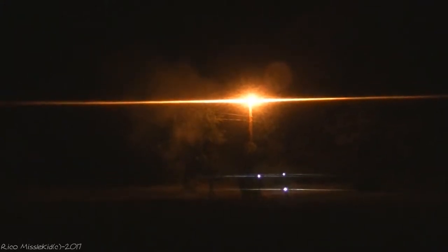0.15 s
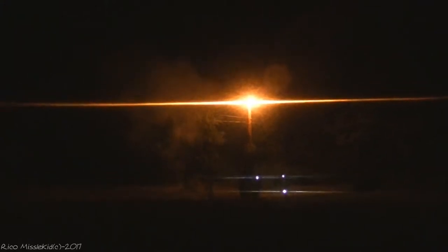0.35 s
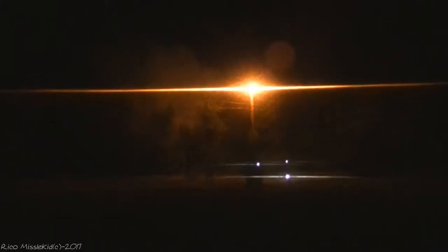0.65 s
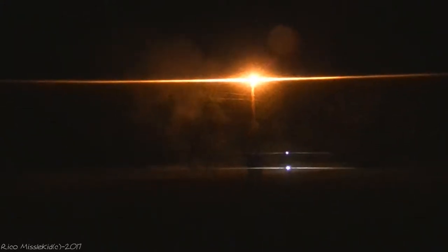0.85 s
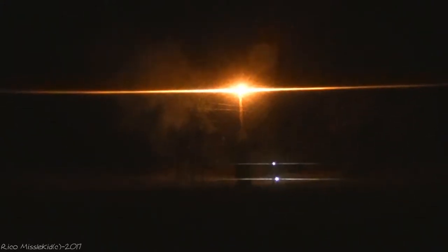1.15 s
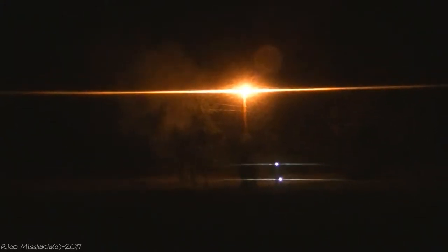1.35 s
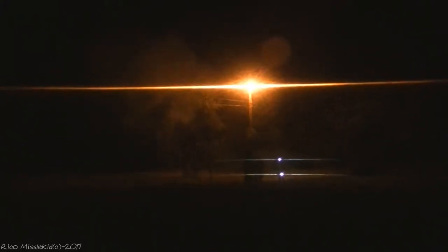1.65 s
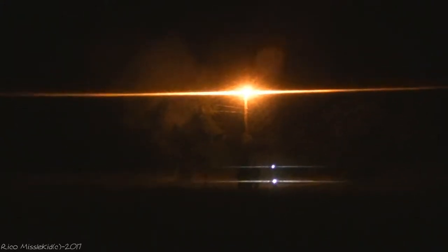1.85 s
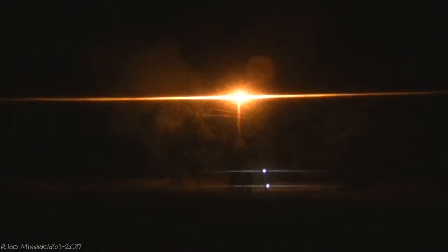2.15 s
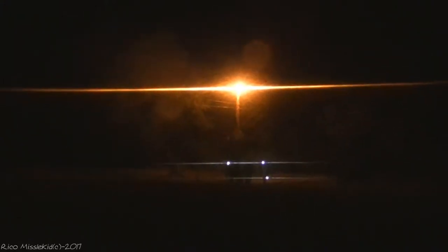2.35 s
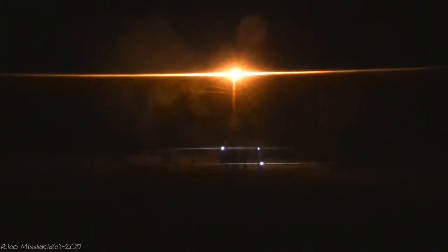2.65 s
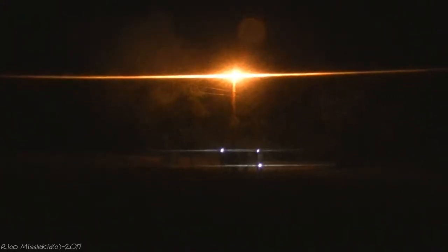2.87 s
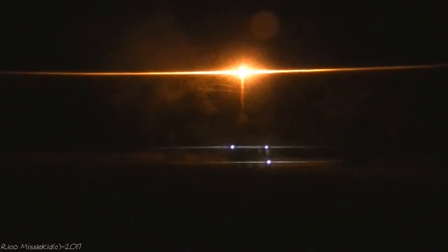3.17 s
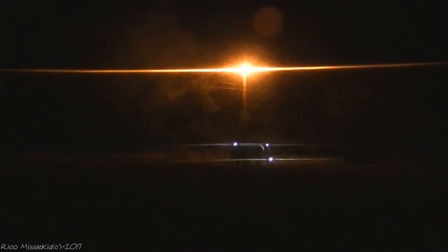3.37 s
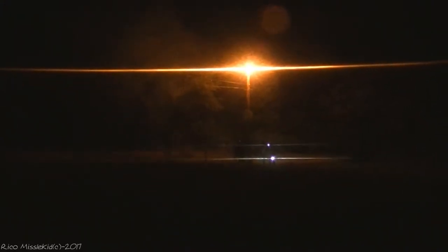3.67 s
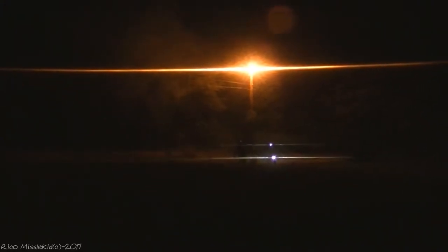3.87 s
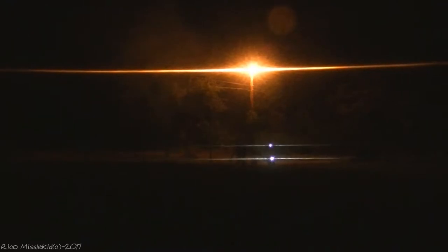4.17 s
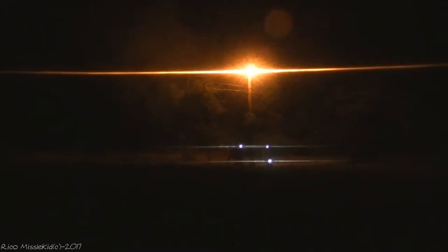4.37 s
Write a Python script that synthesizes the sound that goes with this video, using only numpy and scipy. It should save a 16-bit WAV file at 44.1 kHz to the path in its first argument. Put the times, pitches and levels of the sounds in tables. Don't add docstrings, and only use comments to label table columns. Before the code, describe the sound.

A dense, unbroken chorus of crickets and raspy katydids fills a dark grass field, with a sharp stem tick just after two seconds.

```python
import sys
import numpy as np
from scipy import signal
from scipy.fft import rfft, irfft, next_fast_len
from scipy.io import wavfile
from scipy.ndimage import uniform_filter1d, map_coordinates

SR = 44100
rng = np.random.default_rng(int(sys.argv[2]) if len(sys.argv) > 2 else 0)


def gain_from_db(level_db):
    decades = np.asarray(level_db, float) / 20
    return 10 ** decades


def output_pcm(signal):
    pcm = np.clip(np.atleast_2d(signal).T, -1, 1) * 32767
    wavfile.write(sys.argv[1], SR, np.round(pcm).astype(np.int16))


N = 199053

# pitch in Hz, pitch spread in Hz, wing strokes per second, stroke sharpness (exponent),
# level in dB, stereo width in radians, left lean in dB.
CRICKET_KINDS = [
    (3031, 70, 75, 5.1, -43, 0.47, 2.5),
    (3873, 74, 46, 1.45, -42.5, 0.25, 2.7),
    (6984, 150, 92, 1.7, -50, 0.22, -0.5),
]
# time in seconds, then low, middle and high kind in dB.
CRICKET_SWELL = [(0.0, -3.5, -0.9, 1.15), (4.51, -1.8, 0.5, -0.8)]

# time in seconds, level in dB.
CROWD_EFFORT = [(0.0, -39.5), (0.7, -41), (1.21, -40.5), (1.41, -41), (1.59, -40.5), (1.8, -38.5),
                (2.15, -42), (2.59, -40), (2.74, -41), (4.51, -41)]
# frequency in Hz, density in dB per Hz.
LOW_RASP = [(1400, -120), (1600, -45), (1800, -11), (2080, -1), (2450, -3), (2900, 3), (3500, 3.5),
            (4000, -3.5), (4600, -120)]
HIGH_RASP = [(3000, -120), (3500, -22.5), (4150, -1), (4700, 0.5), (5250, -1.5), (5800, -5.5),
             (6250, -13.5), (6800, -14.5), (7500, -53), (8200, -120)]
LOW_RASP_DB, HIGH_RASP_DB = -43, -40
LOW_FOLLOWS = 0.1

# time in seconds, strength at the ports in dB.
BREEZE = [(0, -75), (.1, -88), (.64, -84), (.73, -77.5), (1.52, -76.5), (2.05, -87.5), (2.21, -85),
          (2.34, -92), (2.47, -78.5), (2.71, -80), (2.78, -78), (3.27, -81), (3.66, -88), (4.1, -83),
          (4.51, -78)]
# time in seconds, level in dB.
TRAFFIC_LEVEL = [(0, -69.5), (.45, -71.5), (.9, -85), (1.7, -77), (2.6, -98), (4.1, -89), (4.51, -76)]
# frequency in Hz, density in dB per Hz.
BUFFET_COLOUR = [(12, -25), (20, 1), (129, -2.5), (180, -3), (230, -44), (400, -120)]
ROAD_COLOUR = [(120, -60), (200, -7), (280, -0.5), (400, -6), (550, -21), (800, -60)]
HUM_COLOUR = [(100, -29), (170, -12.5), (252, -1.5), (750, -7), (900, -6), (1210, -9), (1700, -2),
              (2210, -28), (3740, -120)]
HISS_COLOUR = [(5000, -52), (7000, -4.5), (7600, 1), (8200, -8), (9000, -5.5), (10200, -7.5), (11100, -7),
               (13100, -12), (15600, -17.5)]
# frequency in Hz, left-right likeness from -1 to 1.
HUM_ALIKE = [(60, .06), (130, 0.12), (290, -0.43), (640, -0.1), (1400, 0.43)]
# frequency in Hz, level in dB.
WHINE_LINES = [(7853, -86), (7882, -85)]
HUM_DB, HISS_DB = -65, -63.5
HUM_FOLLOWS, HISS_FOLLOWS = .2, 0.13

# first stroke in seconds,
# last stroke in seconds, wing resonance in Hz, first level in dB, last level in dB.
NEAREST = [(.125, .125, 5120, -44, -43), (.506, 0.74, 5240, -42.5, -49), (.84, 1.06, 5060, -44.5, -47),
           (1.2, 1.25, 5220, -49, -48), (1.645, 1.865, 5180, -47, -45), (2.059, 2.059, 5170, -46, -44),
           (2.386, 2.64, 5110, -43, -44.5), (3.145, 3.377, 5200, -44, -41),
           (3.807, 3.807, 5110, -42, -44.5), (3.971, 4.19, 5290, -41, -44),
           (4.479, 4.479, 5070, -43.5, -44)]
NEAR = [(.03, 0.14, 4600, -51, -48), (.37, .635, 4850, -44.5, -45), (.39, .52, 4550, -50, -45),
        (.635, .635, 4600, -43, -43), (.5, .635, 5600, -50, -45.5), (.859, .958, 4600, -41, -40),
        (.846, .949, 5650, -48, -48), (1.167, 1.277, 4600, -44, -41), (1.4, 1.4, 4770, -45, -46),
        (1.25, 1.25, 5700, -45.5, -46), (1.634, 1.875, 4900, -41, -42), (1.64, 1.88, 4500, -51, -46),
        (2.344, 2.618, 4800, -47, -47), (3.155, 3.48, 5550, -49, -48.5), (3.17, 3.29, 4570, -54, -47),
        (3.58, 3.66, 5030, -47, -48), (3.85, 3.96, 4750, -47, -44), (4.41, 4.41, 4900, -45, -45)]
DEEP = [(1.876, 1.978, 2340, -51, -56), (2.381, 2.595, 2750, -49, -46), (3.361, 3.47, 2640, -48, -49),
        (3.952, 4.09, 2600, -48.5, -50)]
TINY = [(3.7, 3.815, 12300, -71, -70), (4.43, 4.43, 12000, -71, -71), (2.76, 2.76, 11800, -72, -72)]
# middle in seconds, pitch in Hz, level in dB.
THIN_TRILLS = [(2.6, 10900, -76), (2.85, 10850, -75), (3.1, 10850, -75), (4.2, 10900, -75)]
SYLLABLE_S = .115

# middle in seconds, length in seconds, level change in dB.
LULLS = [(.68, 0.026, -0.5), (0.93, 0.035, -1.5), (3.202, 0.017, -2.5), (3.53, 0.057, -1.5),
         (4.24, 0.056, -1)]
JOIN_DB, JOIN_S = 0.5, 0.038
CROWD_JOINS = 1.23

# start in seconds, end in seconds, first pitch in Hz, last pitch in Hz, level in dB.
PEEPS = [(0.0495, .14, 920, 905, -68), (1.46, 1.582, 1020, 925, -69), (1.632, 1.72, 880, 1000, -71),
         (2.473, 2.518, 910, 880, -68), (4.22, 4.364, 945, 850, -70.5), (3.39, 3.52, 2375, 2360, -45.5),
         (3.03, 3.24, 335, 350, -72.5)]

# start in seconds, peak level in dB, ring in Hz, share of crack.
STEM_TICKS = [(1.048, -52, 10800, .1), (1.082, -39.5, 9840, .4), (1.0825, -42, 8260, .1),
              (1.0905, -52, 9800, .05), (1.1915, -47, 8600, .1), (1.2012, -46, 8350, .05),
              (2.1335, -55, 10200, .5), (2.165, -25, 6900, .07), (2.165, -39.5, 8900, .4)]
# start in seconds, end in seconds, centre in Hz, level in dB.
STEM_DRAGS = [(2.13, 2.17, 9900, -59), (2.168, 2.21, 8000, -53), (1.05, 1.11, 8800, -62)]
STEM_LAG = .45


def unit(x):
    return x / np.sqrt(np.mean(x ** 2) + 1e-20)


def lean(db):
    return gain_from_db([[db / 2], [-db / 2]])


def bell(x, centre, width):
    return np.exp(-.5 * ((x - centre) / width) ** 2)


def along(points, hz):
    f, v = np.transpose(points)
    return np.interp(np.log(hz + 1), np.log(f + 1), v)


def curves(rows):
    s, *columns = np.transpose(rows)
    return [np.interp(np.arange(N) / SR, s, column) for column in columns]


def wobble(rate):
    return map_coordinates(rng.standard_normal(400), [np.arange(N) * min(rate, 80) / SR])


def filtered(x, response):
    m = next_fast_len(x.shape[-1] + 8192)
    return irfft(rfft(x, m) * response(np.fft.rfftfreq(m, 1 / SR)), m)[..., :x.shape[-1]]


def rush(spectrum, alike, patchy_db, lean_db=0):
    z = signal.stft(rng.standard_normal((2, N)), nperseg=512)[2]
    patches = uniform_filter1d(rng.standard_normal(z.shape[1:]), size=9, axis=0)
    for frames in (8, 5):
        patches = uniform_filter1d(patches, size=frames, axis=1)
    pair = signal.istft(z * gain_from_db(patchy_db * unit(patches)), nperseg=512)[1][:, :N]

    def mid_side(hz):
        turn = np.arccos(np.clip(along(alike, hz), -1, 1)) / 2
        return gain_from_db(along(spectrum, hz)) * [np.cos(turn), np.sin(turn)]

    mid, side = filtered(pair, mid_side)
    return unit(np.array([mid + side, mid - side]) * lean(lean_db))


def add(out, s, sound):
    i = max(round(s * SR), 0)
    out[..., i:i + sound.shape[-1]] += sound[..., :max(N - i, 0)]


def crickets(count=18):
    out = np.zeros((2, N))
    for row, swell_db in zip(CRICKET_KINDS, curves(CRICKET_SWELL)):
        hz, spread_hz, rate, sharp, db, width, lean_db = row
        kind = np.zeros((2, N))
        for place in np.sinh(1.6 * np.linspace(-1, 1, count)):
            pitch = hz + spread_hz * (.8 * place + .35 * wobble(40))
            stroke_rate = rate * (1 + .12 * rng.standard_normal() + 0.04795 * wobble(6))
            stroke = np.pi * np.cumsum(stroke_rate) / SR
            size = np.abs(np.sin(stroke + 7 * rng.random())) ** sharp * gain_from_db(1.5 * wobble(3.85))
            phase = 2 * np.pi * (np.cumsum(pitch) / SR + rng.random())
            lag = width * rng.choice([-1, 1]) * (0.5 + 0.76 * rng.random())
            kind += size * np.sin([phase + lag, phase - lag])
        out += gain_from_db(db + swell_db) * unit(kind) * lean(lean_db)
    return out


def katydid_crowd():
    effort_db, = curves(CROWD_EFFORT)
    effort_db = effort_db - effort_db.mean()
    low = rush(LOW_RASP, [(1600, 0.47), (2200, 0.83), (3500, 0.88)], patchy_db=0.8, lean_db=1.5)
    high = rush(HIGH_RASP, [(4000, 0.97), (5000, 0.94), (7000, .94)], patchy_db=1.2, lean_db=0.7)
    return gain_from_db(LOW_RASP_DB + LOW_FOLLOWS * effort_db) * low + gain_from_db(HIGH_RASP_DB + effort_db) * high


def air():
    breeze_db, = curves(BREEZE)
    gust_db = breeze_db - breeze_db.mean()
    buffet = rush(BUFFET_COLOUR, [(30, 0.24), (150, .05)], patchy_db=-0.2, lean_db=0.5)
    buffet *= gain_from_db(breeze_db + 1.5 + 0.64 * wobble(4.9))
    road = gain_from_db(curves(TRAFFIC_LEVEL)[0]) * rush(ROAD_COLOUR, [(300, .3)], patchy_db=-0.5)
    hum = gain_from_db(HUM_DB + HUM_FOLLOWS * gust_db) * rush(HUM_COLOUR, HUM_ALIKE, patchy_db=0.5)
    hiss_alike = [(8000, 0.94), (9300, 0.92), (10500, 0.92), (12500, 0.93), (15000, 0.79)]
    hiss = rush(HISS_COLOUR, hiss_alike, patchy_db=0.5)
    hiss *= gain_from_db(HISS_DB + HISS_FOLLOWS * gust_db + 0.69 * wobble(21.02))
    t = np.arange(N) / SR
    whine = sum(gain_from_db(db + 3 + 3 * wobble(4)) * np.sin(2 * np.pi * hz * t) for hz, db in WHINE_LINES)
    return buffet + road + hum + hiss + whine


def strokes(phrases):
    rows = []
    for first, last, hz, first_db, last_db in phrases:
        count = 1 + round((last - first) / SYLLABLE_S)
        rows.extend(np.linspace((first, hz, first_db), (last, hz, last_db), count))
    return rows


def field_swell():
    t = np.arange(N) / SR
    joined = np.max([bell(t, s, JOIN_S / 2) for s, _, _ in strokes(NEAREST + NEAR)], axis=0)
    lull_db = sum(db * bell(t, s, length / 2) for s, length, db in LULLS)
    return gain_from_db(JOIN_DB * (joined - joined.mean()) + lull_db)


def syllables(rows, length, width_hz, skirt, gain_db, side):
    out, n = np.zeros((2, N)), round(length * SR)
    for s, hz, db in rows:
        teeth = rng.standard_normal((2, n)) * (0.52 + (rng.random(n) < .05) * 1.05)
        ring = filtered(teeth, lambda f: bell(f, hz, width_hz) + skirt * bell(f, hz, 550))
        mid, off = ring / np.sqrt(np.abs(uniform_filter1d(ring ** 2, size=500)) + 1e-12)
        pair = np.array([mid + side * off, mid - side * off])
        add(out, s - length / 2, gain_from_db(db + gain_db) * np.hanning(n) ** 0.5 * pair)
    return out


def near_singers():
    nearest = syllables(strokes(NEAREST), length=.065, width_hz=85, skirt=.08, gain_db=2.5, side=.1)
    near = syllables(strokes(NEAR), length=.075, width_hz=210, skirt=.25, gain_db=1.6, side=.1)
    deep = syllables(strokes(DEEP), length=0.064, width_hz=150, skirt=0.077, gain_db=1.0, side=0.28)
    tiny = syllables(strokes(TINY), length=.07, width_hz=800, skirt=0, gain_db=0, side=.2)
    thin = syllables(THIN_TRILLS, length=.4, width_hz=130, skirt=0, gain_db=0, side=.2)
    return nearest + near + deep + tiny + thin


def peeps():
    out = np.zeros((2, N))
    for start, end, from_hz, to_hz, db in PEEPS:
        n = round((end - start) * SR)
        phase = 2 * np.pi * np.cumsum(np.linspace(from_hz, to_hz, n)) / SR
        add(out, start, gain_from_db(db) * np.hanning(n) * np.sin(phase))
    return out


def stems():
    out, t = np.zeros((2, N)), np.arange(300) / SR
    blow = t / 0.00036 * np.exp(1 - t / 0.00041)
    lead = np.array([[STEM_LAG / 2], [-STEM_LAG / 2]])
    for s, db, hz, crack in STEM_TICKS:
        ring = blow * np.sin(2 * np.pi * hz * t + lead)
        noise = rng.standard_normal(len(t)) + .3 * rng.standard_normal((2, len(t)))
        snap = filtered(noise * blow, lambda f: bell(f, 11500, 3300))
        add(out, s, gain_from_db(db) * (ring + crack * snap / np.abs(snap).max()))
    for start, end, hz, db in STEM_DRAGS:
        n = round((end - start) * SR)
        noise = rng.standard_normal(n) + 0.26 * rng.standard_normal((2, n))
        drag = filtered(noise, lambda f: bell(f, hz, 1100))
        add(out, start, gain_from_db(db) * unit(drag) * np.hanning(n) ** .6)
    return out


def scene():
    swell = field_swell()
    far = swell * crickets() + swell ** CROWD_JOINS * katydid_crowd() + swell * air()
    return far + near_singers() + peeps() + stems()


def band_limit(x):
    return signal.sosfilt(signal.butter(12, 15760, fs=SR, output="sos"), x)


def record(dry):
    mix = filtered(dry, lambda hz: hz < 15750)
    return band_limit(mix)


dry = scene()
out = record(dry)
output_pcm(out)
```